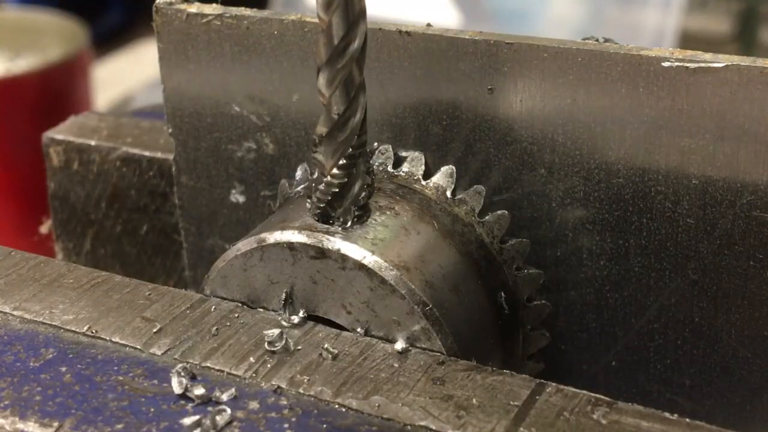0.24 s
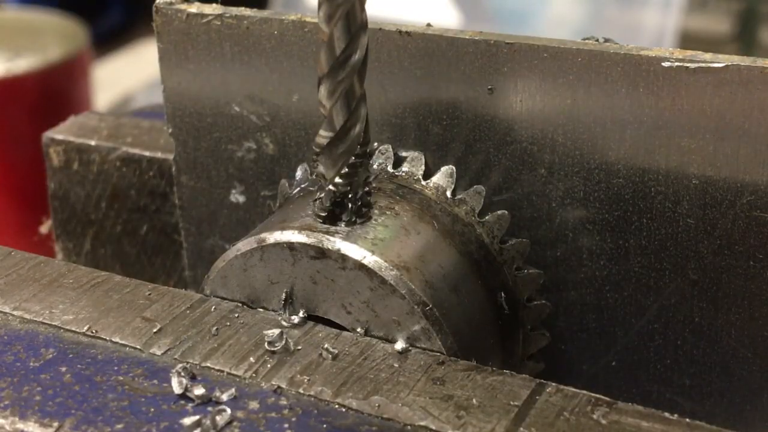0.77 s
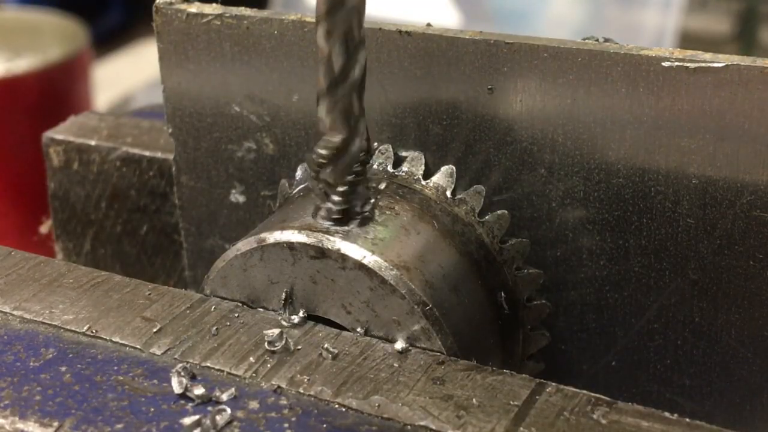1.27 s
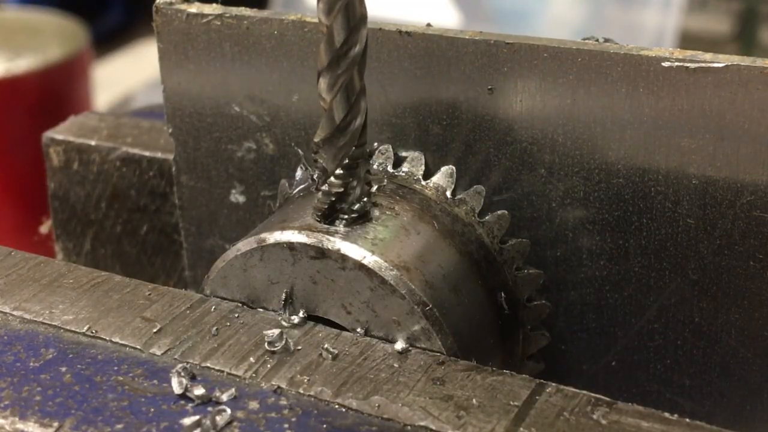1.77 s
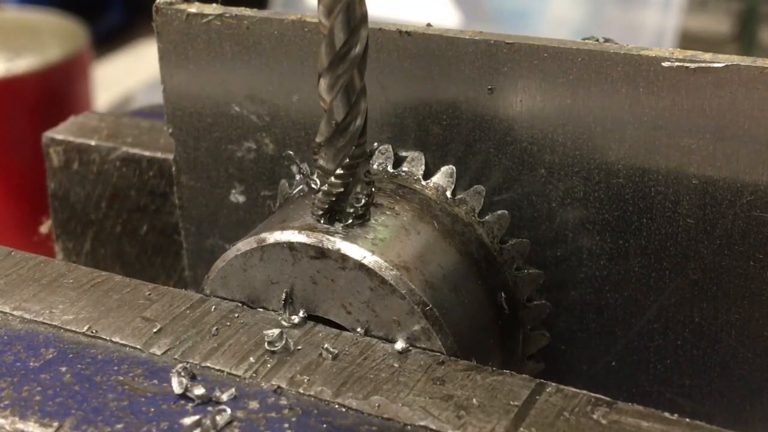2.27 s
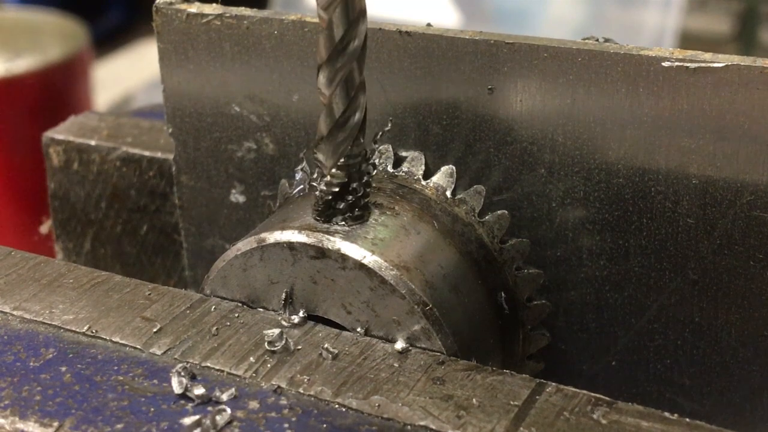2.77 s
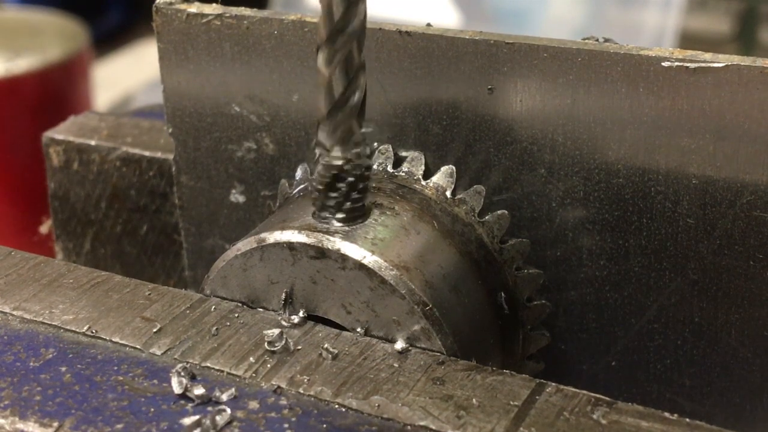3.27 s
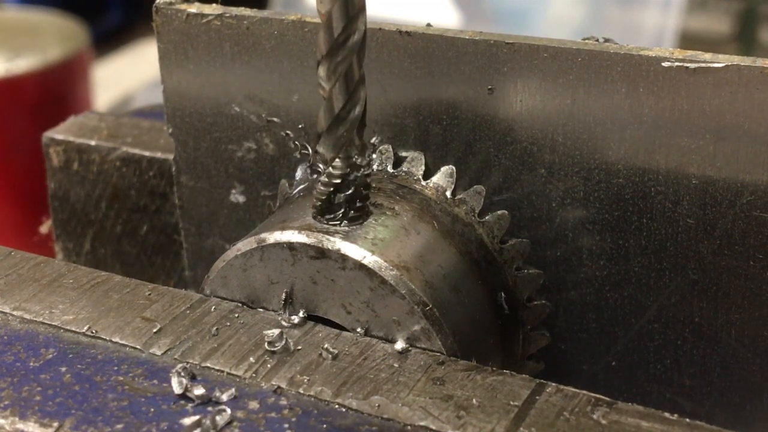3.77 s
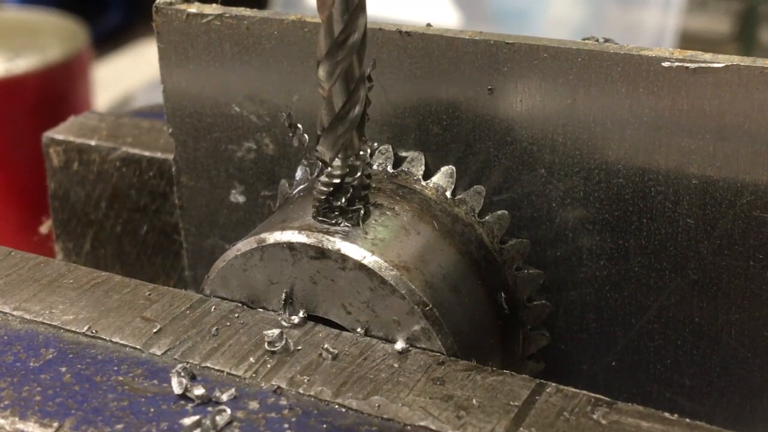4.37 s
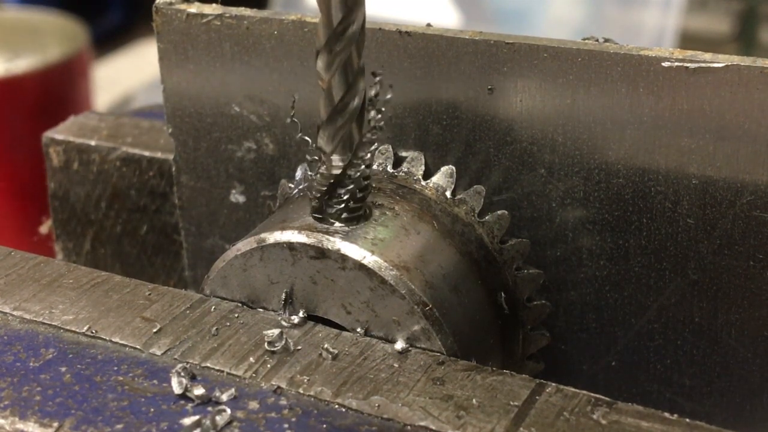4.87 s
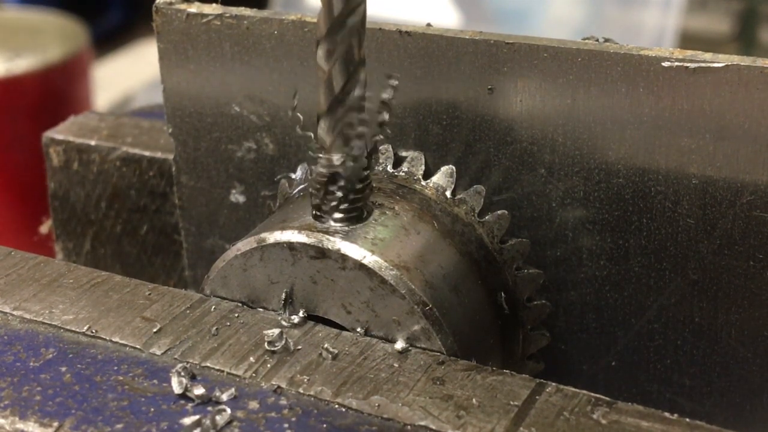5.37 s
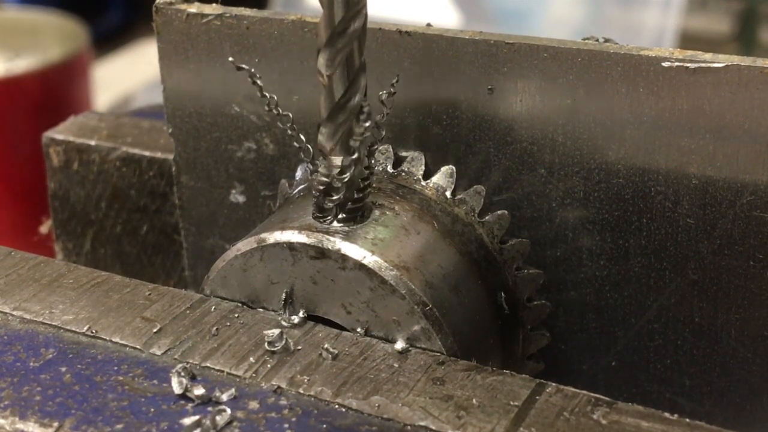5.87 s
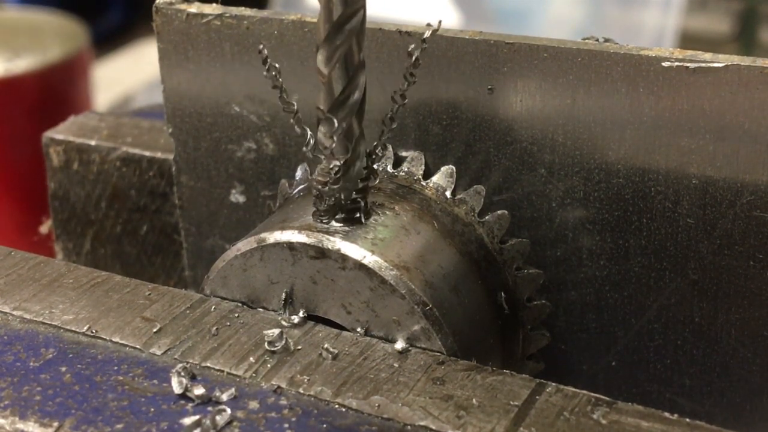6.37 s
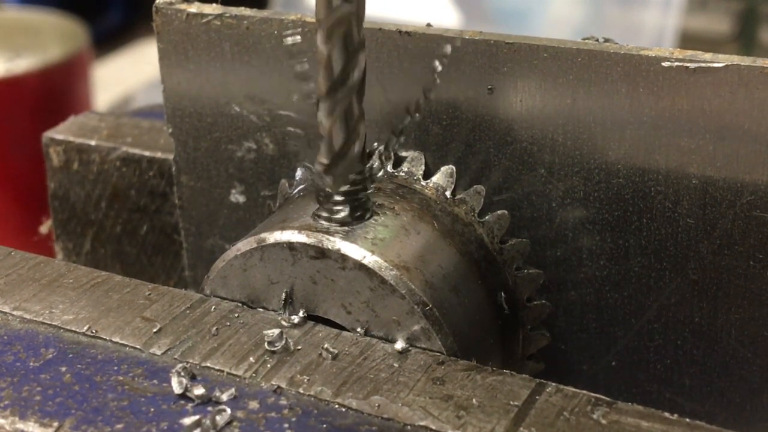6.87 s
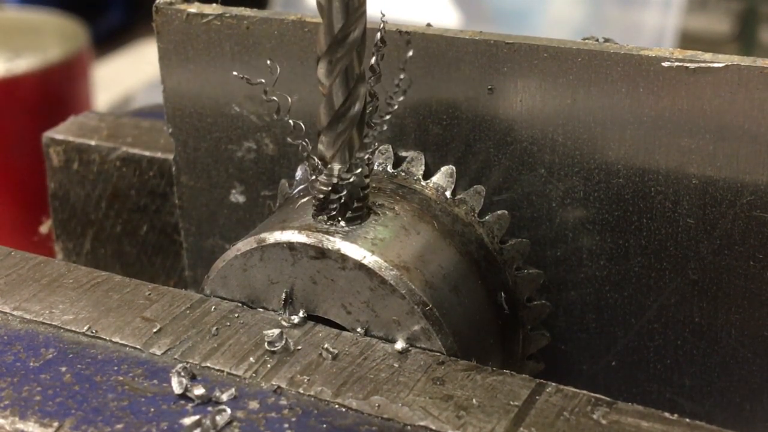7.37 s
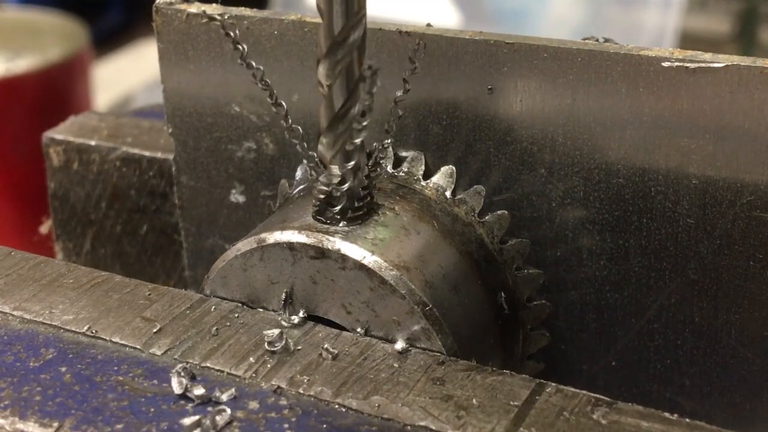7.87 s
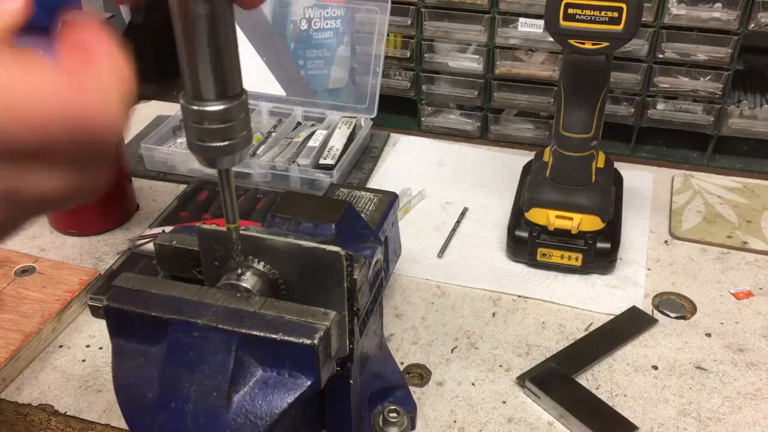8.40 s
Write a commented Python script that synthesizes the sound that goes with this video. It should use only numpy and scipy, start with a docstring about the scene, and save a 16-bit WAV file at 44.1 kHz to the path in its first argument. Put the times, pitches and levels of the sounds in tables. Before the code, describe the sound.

Close, bright metallic ratchet clicks come in regular short bursts, with soft cutting scrapes and small knocks between them, in a small, quiet room.

```python
"""Ratchet tap wrench at a vise

A ratchet tap wrench drives a tap into a steel gear held in a vise, close by in a small quiet workshop.
Each back swing takes up the slack with knocks, then the pawl rides over two or three teeth: soft ticks
and sharp clicks, made of noise bursts, decaying modes and a short ping. On each forward stroke the tap rasps
(resonant and gritty noise under a force curve) and chips crack off as bursts. The bench thuds softly as a
swelling low sine; shaped noise gives the room rumble, hiss and a faint whine."""
import sys
import numpy as np
from scipy import signal
from scipy.fft import rfft, irfft, next_fast_len
from scipy.io import wavfile
from scipy.ndimage import map_coordinates

SR = 44100
rng = np.random.default_rng(int(sys.argv[2]) if len(sys.argv) > 2 else 0)


def master_out(mix):
    """Clip the mix to full scale and print it as 16-bit PCM to the path in sys.argv[1]."""
    frames = np.transpose(np.atleast_2d(mix))
    ceiling = np.clip(frames, -1, 1)
    pcm = np.round(ceiling * 32767).astype(np.int16)
    wavfile.write(sys.argv[1], SR, pcm)


N = 381024
TIME = np.arange(N) / SR  # s
AGE = np.arange(SR // 6) / SR  # s since a contact

# All event and colour levels are relative: each source sets its own final gain.
# back swings: hand_reverses_s, play_time_s (until the slack is taken up), catch_db, load_on_tap_db
BACK_SWINGS = [(0.167, 0.021, -44, 0.5), (0.937, .016, -29.5, 3), (1.615, 0.019, -33.5, -0.5),
               (2.262, 0.024, -37.5, -1.5), (2.988, 0.012, -31.5, 0), (3.705, 0.025, -31.5, -1),
               (4.396, 0.016, -32.5, -0.5), (5.143, .019, -40, 2.5), (5.845, .023, -38.5, -3),
               (6.576, 0.022, -33, 2), (7.274, 0.018, -41.5, -0.5), (8.024, .024, -38.5, -4)]
# forward strokes: greatest_force_s, rasp_db, nominal_length_s
FORWARD_STROKES = [(0.752, -61, 0.19), (1.412, -58, 0.19), (2.069, -57, 0.17), (2.782, -58.5, 0.19),
                   (3.492, -57, 0.18), (4.19, -56.5, 0.16), (4.927, -55.5, 0.16), (5.618, -57, 0.16),
                   (6.342, -57, 0.15), (7.076, -57.5, 0.13), (7.795, -60, 0.18)]
# the hand lets the wrench settle: start_s, clack_db, knock_db
SETTLINGS = [(0.458, -36.5, -36), (1.171, -40, -45.5), (1.877, -43, -39.5), (2.522, -62, -45.5),
             (3.199, -50, -51), (3.242, -54, -45.5), (5.354, -40, -50), (6.868, -41.5, -39.5),
             (7.562, -68, -46.5), (8.284, -47, -44), (8.364, -55, -43)]
# colour of loose wrench parts in contact: frequency_hz, level_db (per Hz)
CLACK_COLOUR = [(200, -25), (800, -19.5), (2200, -0.5), (2900, -7), (4000, -1), (5800, -3), (7000, -4),
                (8400, 2), (10100, -8.5), (11400, 2), (13200, -6.5), (15500, -22.5), (16800, -26)]
# colour of breaking chips, also used for the sliding hand: frequency_hz, level_db (per Hz)
CHIP_COLOUR = [(250, -25), (1400, -9.5), (2800, -13.5), (6200, -7.5), (7200, -1.5), (8600, 2), (10400, -8),
               (11200, 0), (15000, -6), (16600, -25)]
SEAT_S = 0.014  # delay of the contact in which a settling wrench seats


def amp(db):
    """Logarithmic level: decibels to amplitude gain."""
    return 10 ** (np.asarray(db) / 20)


def unit(x):
    """Power normalisation: scale to rms 1."""
    return x / np.sqrt(np.mean(x ** 2) + 1e-20)


def blow(x):
    """Energy normalisation: scale to the energy of one millisecond at rms 1."""
    return x * np.sqrt(SR / 1000 / (np.sum(x ** 2) + 1e-20))


def fade(t60):
    """Exponential damping: a decay that loses 60 dB in t60 seconds."""
    return amp(-60 * AGE / t60)


def along(points, hz):
    """Logarithmic frequency scale: interpolate (Hz, value) points on it."""
    f, v = np.transpose(points)
    return np.interp(np.log(hz + 1), np.log(f + 1), v)


def curve(rows):
    """Level envelope: gain per sample from (s, dB) rows, silent outside them."""
    return amp(np.interp(TIME, *np.transpose(rows), left=-200, right=-200))


def wobble(rate):
    """Slow random modulation: a smooth curve with rate knots a second."""
    knots = rng.standard_normal(int(N * rate / SR) + 4)
    return map_coordinates(knots, [TIME * rate])


def filtered(x, response):
    """Linear filtering: multiply the spectrum of x by a response of frequency."""
    size = next_fast_len(N + SR // 2)
    hz = np.fft.rfftfreq(size, 1 / SR)
    return irfft(rfft(x, size) * response(hz), size)[:N]


def noise(spectrum, grain_db=0):
    """Spectral shaping: coloured noise of rms 1, made gritty by random gain of grain_db."""
    grit = rng.standard_normal(N) * amp(grain_db * wobble(900))
    return unit(filtered(grit, lambda hz: amp(along(spectrum, hz))))


def band(centre_hz, width_hz):
    """Quadrature modulation: slow noise moves up to a resonance whose centre may vary; rms 1."""
    slow = filtered(rng.standard_normal(N), lambda hz: 1 / (1 + (2 * hz / width_hz) ** 2))
    # half the signal away, the same noise serves as the second component
    quarter = np.roll(slow, N // 2)
    phase = 2 * np.pi * np.cumsum(centre_hz * np.ones(N)) / SR
    return unit(slow * np.cos(phase) + quarter * np.sin(phase))


def burst(spectrum, t60):
    """Impulsive excitation: dying noise passes through a causal, minimum-phase colour."""
    size = len(AGE)
    log_gain = np.log(amp(along(spectrum, np.fft.rfftfreq(size, 1 / SR))))
    cepstrum = irfft(log_gain, size)
    # folding the cepstrum forward in time makes the filter causal
    cepstrum[1:size // 2] *= 2
    cepstrum[size // 2 + 1:] = 0
    puff = rng.standard_normal(size) * fade(t60)
    return blow(irfft(np.exp(rfft(cepstrum)) * rfft(puff), size))


def ring(modes, attack, scatter_db, detune):
    """Modal synthesis: damped sines struck at new strengths; each strike detunes them a little at random."""
    chance = rng.standard_normal((len(modes), 3))
    tones = 0
    for (hz, db, t60), (strength, shift, sign) in zip(modes, chance):
        gain = np.sign(sign) * amp(db + scatter_db * strength)
        tones = tones + gain * fade(t60) * np.sin(2 * np.pi * hz * (1 + detune * shift) * AGE)
    return blow(tones * (1 - np.exp(-AGE / attack)))


def add(track, s, sound):
    """Superposition: mix a sound into the track at s seconds."""
    part = track[max(round(s * SR), 0):][:len(sound)]
    part += sound[:len(part)]


def ratchet():
    """Impact excitation: the pawl ticks against teeth and clicks off them on the back swing."""
    # the pawl drops off a tooth, the pawl meets a tooth: frequency_hz, level_db (per Hz)
    crack_colour = [(200, -7), (500, -18.5), (1400, -2), (2800, -3.5), (3400, -1), (4100, -5.5),
                    (5400, 2.5), (6600, -1), (8400, 6.5), (9700, -1), (13500, -1.5), (15500, -9),
                    (16800, -14)]
    tick_colour = [(300, -15), (1000, -17.5), (3000, -17), (4500, -11.5), (5400, -2.5), (6800, -13.5),
                   (8200, -7), (10300, -1.5), (11700, 2), (14000, -11), (15500, -19.5), (16800, -32)]
    # the ratchet head sings on after each click: frequency_hz, level_db (per Hz)
    head_colour = [(9500, -50), (11150, -9.5), (11750, -1), (12250, -14), (14000, -50.5)]
    # modes of the wrench body, damped by the hand: frequency_hz, level_db, t60_s
    wrench_modes = [(3414, 4.5, 0.0095), (3290, -18.5, .035), (3546, -17.5, 0.041), (8770, -7, 0.017)]
    out = np.zeros(N)
    for s, ping_db, hz, crack_db, ring_db, knock_db in drops():
        shift, strength = rng.standard_normal(2)
        # the pawl scrapes over the tip of the tooth just before it falls
        add(out, s - 0.0022, amp(crack_db - 11.5) * burst(CLACK_COLOUR, t60=0.02))
        # every tooth sets the head singing a little differently
        shifted = [(f * (1 + 0.012 * shift), db) for f, db in head_colour]
        song = amp(-22 + 2 * strength) * burst(shifted, t60=0.14)
        add(out, s, amp(ping_db + 1.0) * (ping(hz, rebound=0.00092, rebound_db=-3) + song))
        add(out, s, amp(crack_db + 2.0) * burst(crack_colour, t60=0.01))
        body = ring(wrench_modes, attack=0.00094, scatter_db=2, detune=0.028)
        add(out, s + 0.0005, amp(ring_db) * body)
        add(out, s + 0.001, amp(knock_db - 3.0) * knock())
    for s, db in ticks():
        add(out, s, amp(db - 2.0) * burst(tick_colour, t60=0.0068))
    return out


def ping(hz, rebound, rebound_db):
    """Damped resonance: the small steel pawl rings very briefly and strikes once more as it seats."""
    swell = AGE * np.exp(-AGE / 0.00026)
    late, pitch = rng.uniform(-1, 1, 2)
    out = swell * np.sin(2 * np.pi * hz * AGE)
    second = swell * np.sin(2 * np.pi * hz * (1 + 0.025 * pitch) * AGE)
    add(out, rebound * (1 + 0.27 * late), amp(rebound_db) * second)
    return blow(out)


def knock():
    """Structure-borne sound: a blow down the tap rings gear and vise, and their clamped faces clatter."""
    # tap, gear and vise ring together: frequency_hz, level_db, t60_s
    vise_modes = [(619, -18, 0.091), (741.6, -0.5, 0.1), (914, -14.5, 0.019), (977, -4.5, 0.12),
                  (1119, -12, 0.018), (1384, 2, 0.043), (1947, 6.5, 0.023), (2255, -3.5, 0.037),
                  (2395, 5, 0.017)]
    # the clamped stack clatters: frequency_hz, level_db (per Hz)
    clatter_colour = [(120, -19.5), (280, -11), (470, -12.5), (700, 1.5), (980, 7), (1200, -5), (1450, -1),
                      (2200, -4), (2900, -11), (6000, -18)]
    modes = ring(vise_modes, attack=0.0025, scatter_db=2.5, detune=0.012)
    return amp(-4) * modes + amp(-2.5) * burst(clatter_colour, t60=0.054)


def swing_clicks():
    """Event grouping: the clicks of each back swing."""
    # the pawl drops off a tooth: start_s, level_db
    click_rows = [(0.2366, -11), (0.2758, -10.5), (1.016, -6.5), (1.0497, -11), (1.0914, -8), (1.6937, -6),
                  (1.729, -11.5), (1.7626, -9.5), (2.3401, -11.5), (2.3723, -10.5), (2.4097, -5.5),
                  (3.064, -4.5), (3.101, -11.5), (3.147, -8.5), (3.777, -6), (3.8104, -13.5),
                  (3.8482, -8.5), (4.4685, -5.5), (4.508, -9.5), (4.5531, -8), (5.2228, -9.5),
                  (5.259, -11.5), (5.2965, -10), (5.9188, -11), (5.9548, -12.5), (6.001, -8),
                  (6.6525, -9.5), (6.6888, -11), (7.3572, -4.5), (7.4015, -8), (7.4761, -11.5),
                  (8.101, -11), (8.135, -12)]
    swing_s = 0.3  # a back swing is over within this time
    return [[(s, db) for s, db in click_rows if start < s < start + swing_s]
            for start, *_ in BACK_SWINGS]


def drops():
    """Load coupling: (s, ping dB, ping Hz, crack dB, ring dB, knock dB) of each click, by tooth and load."""
    # first to third tooth of a swing; the knock weakens as the load comes off:
    # ping_hz, crack_db, wrench_ring_db, knock_db
    teeth = [(11770, -21.5, -25, -24.5), (11800, -21.5, -29.5, -28), (11670, -22.5, -28.5, -32)]
    ping_scatter = 0.0055  # standard deviation, as a share of the pitch
    rows = []
    for (*_, load_db), clicks in zip(BACK_SWINGS, swing_clicks()):
        for (s, db), (hz, crack_db, ring_db, knock_db) in zip(clicks, teeth):
            ping_hz = hz * (1 + ping_scatter * rng.standard_normal())
            rows.append((s, db, ping_hz, crack_db, ring_db + load_db, knock_db + load_db))
    return rows


def ticks():
    """Ratchet kinematics: (s, dB) where the pawl meets three teeth, even if it never clears the last."""
    first_lead_s = 0.0134  # the first tooth is met this long before it drops
    later_lead = 0.345  # a later tooth is met this share of a tooth period before it drops
    tick_db, scatter_db = -29.5, 2.5
    rise_db_per_s = 0.69  # the ticks grow firmer as the work goes on
    times = []
    for (first, _), (second, _), *_ in swing_clicks():
        climb = (1 - later_lead) * (second - first)
        times += [first - first_lead_s, first + climb, second + climb]
    return [(s, tick_db + rise_db_per_s * s + scatter_db * rng.standard_normal()) for s in times]


def rattle(spread_s, below_db, knock_below_db):
    """Secondary impacts: each click shakes loose parts into weak bounces, and the tap knocks in its hole."""
    out = np.zeros(N)
    for s, _, _, crack_db, _, knock_db in drops():
        for when, size in rng.uniform(size=(3, 2)):
            bounce_db = crack_db + below_db - 23 * size - 8.4 * when
            add(out, s + 0.0046 + spread_s * when, amp(bounce_db) * burst(CLACK_COLOUR, t60=0.027))
        add(out, s + spread_s * rng.uniform(), amp(knock_db + knock_below_db) * knock())
    return out


def slack():
    """Contact stiffness: loose wrench joints clack and knock on the tap; harder contacts are brighter."""
    out = np.zeros(N)
    for s, clack_db, knock_db, bright_db in contacts():
        # brightness tilts the colour above 4500 Hz, in dB per octave
        colour = [(hz, db + bright_db * np.log2(max(hz, 4500) / 4500)) for hz, db in CLACK_COLOUR]
        clack = amp(clack_db + 0.5) * burst(colour, t60=0.011)
        add(out, s, clack + amp(knock_db + 1.5) * knock())
    return out


def contacts():
    """Backlash: (s, clack dB, knock dB, dB per octave) as play closes before a swing and chatters shut after."""
    # first contact as the hand reverses: clack_db, knock_db, brightness_db_per_octave
    reversal = (-39.5, -41.5, -11)
    catch_knock_db, catch_bright_db = -3, -1  # knock against its clack; brightness per octave
    seat_clack_db, seat_bright_db = -9.5, -6  # clack against the first; brightness per octave
    chatter_db = -5.5  # against the clack and knock of the settling
    rows = []
    for s, play_s, db, _ in BACK_SWINGS:
        rows.append((s, *reversal))
        rows.append((s + play_s, db, db + catch_knock_db, catch_bright_db))
    for s, clack_db, knock_db in SETTLINGS:
        rows.append((s, clack_db, knock_db, 0))
        # a duller contact follows as the wrench seats
        rows.append((s + SEAT_S, clack_db + seat_clack_db, knock_db, seat_bright_db))
        # the joint chatters while it seats
        for when in rng.uniform(size=2):
            rows.append((s + SEAT_S * when, clack_db + chatter_db, knock_db + chatter_db, seat_bright_db))
    return rows


def cutting():
    """Friction excitation: the edges rasp through steel; the tap's resonance rises slightly under load."""
    # colour of the rasp: frequency_hz, level_db (per Hz)
    rasp_colour = [(200, -20.5), (500, -7.5), (740, 3), (1150, -0.5), (1650, -6), (1900, 3.5), (2300, -7),
                   (2800, -17.5), (3900, -4.5), (5800, -19.5), (8300, -12.5), (10200, -26), (11500, -18.5),
                   (15500, -21.5)]
    force = stroke_force(stretch=0.94)
    load = force / force.max()
    resonance = band(1395 + 25 * load + 12 * wobble(14), width_hz=112)
    out = amp(1.3) * force * resonance
    out += amp(-0.5) * force * amp(1.2 * wobble(31)) * noise(rasp_colour, grain_db=3.5)
    # crumbs crackle for as long as the tap turns
    out += amp(-10) * stroke_force(stretch=1.2) * crumbs(rate=460)
    for s, db in chips():
        add(out, s, amp(db - 2.3) * burst(CHIP_COLOUR, t60=0.011))
    return out


def stroke_force(stretch):
    """Force envelope: it swells and eases on each stroke, 10 dB down at the ends of the stretched length."""
    return sum(amp(db - 10 * (2 * (TIME - s) / (length * stretch)) ** 2)
               for s, db, length in FORWARD_STROKES)


def crumbs(rate):
    """Brittle fracture: rate tiny breaks a second, of unequal size and pitch; rms 1."""
    out, age = np.zeros(N), AGE[:SR // 500]
    for when, size, pitch in rng.uniform(size=(int(rate * N / SR), 3)):
        hz = 6500 + 8500 * pitch
        grain = np.exp(-age / 0.00016) * np.sin(2 * np.pi * hz * age)
        add(out, when * N / SR, amp(22 * size ** 2) * grain)
    return unit(filtered(out, lambda hz: amp(along(CHIP_COLOUR, hz))))


def chips():
    """Chip fracture: (s, dB) of the large chips, and of a small one near the height of each stroke."""
    # the largest chips break at the cutting edge: start_s, level_db
    large_chips = [(0.7434, -38), (1.384, -35.5), (1.4412, -40.5), (1.9994, -37), (2.1104, -29),
                   (2.8131, -41), (3.4983, -41.5), (5.7191, -41), (6.2813, -37.5)]
    small_db, scatter_db = -48.5, 3.5
    spread = 0.23  # standard deviation in time, as a share of the nominal stroke length
    rows = list(large_chips)
    for s, _, length in FORWARD_STROKES:
        when = s + spread * length * rng.standard_normal()
        rows.append((when, small_db + scatter_db * rng.standard_normal()))
    return rows


def handling():
    """Lowest-mode resonance and friction: the bench booms briefly; the hand slides on the handle."""
    # the hand slides on the handle: time_s, level_db
    slide_level = [(8.27, -89.5), (8.33, -63.5), (8.4, -56), (8.45, -82)]
    out = curve(slide_level) * noise(CHIP_COLOUR, grain_db=1)
    for s, db in jolts():
        swell = np.sin(np.pi * np.minimum(AGE / 0.11, 1)) * fade(0.2)
        thud_hz = 114 + 6 * rng.standard_normal()
        add(out, s, amp(db + 14.0) * swell * np.sin(2 * np.pi * thud_hz * AGE))
    return out


def jolts():
    """Momentum transfer: (s, dB) as the hand jolts the bench at swing start, swing stop and seating."""
    first_db, last_db = -52, -54  # at the first and last click of a swing
    seat_db = -9  # against a settling knock
    rows = [(s + SEAT_S, knock_db + seat_db) for s, _, knock_db in SETTLINGS]
    for clicks in swing_clicks():
        rows += [(clicks[0][0], first_db), (clicks[-1][0], last_db)]
    return rows


def workshop(x, echo_s, echo_db, wet_db):
    """Reverberation: an echo off the bench, then a short, duller noise tail, renewed every quarter second."""
    # reverberation of the workshop: frequency_hz, t60_s
    room_decay = [(150, 0.64), (1000, 0.39), (3400, 0.27), (7000, 0.2), (11700, 0.19), (16000, 0.34)]
    out = x + amp(echo_db) * filtered(x, lambda hz: np.exp(-2j * np.pi * hz * echo_s))
    spill = amp(wet_db) * filtered(x, lambda hz: 1 / np.hypot(1, hz / 6000))
    # each tail is fresh random noise that decays at its own rate in each frequency
    for start in range(0, N, SR // 4):
        hz, t, z = signal.stft(rng.standard_normal(SR // 2), SR, nperseg=256)
        decay = amp(-60 * t / along(room_decay, hz)[:, None])
        tail = signal.istft(z * decay, SR, nperseg=256)[1]
        wet = signal.fftconvolve(spill[start:start + SR // 4], tail / np.linalg.norm(tail))
        add(out, start / SR + 0.0025, wet)
    return out


def background():
    """Ambient noise: shaped random noise gives room rumble and hiss, and a narrow band a faint whine."""
    # colours of the room's rumble and hiss: frequency_hz, level_db (per Hz)
    rumble_colour = [(22, -36.5), (38, -9), (60, 7.5), (80, -5.5), (125, -7), (165, -15.5), (200, -9),
                     (250, -15), (330, -15), (450, -27), (900, -60.5)]
    air_colour = [(100, 0), (450, -3.5), (650, 1.5), (780, -5.5), (950, 3.5), (1300, -9), (2000, -7),
                  (3000, -13.5), (6000, -14), (9000, -14), (12000, -16.5), (15500, -19.5), (16200, -47)]
    # level of the hiss: time_s, level_db
    hiss_level = [(0, -67.5), (8.15, -68), (8.25, -64.5), (8.64, -65)]
    rumble = amp(-58.0) * noise(rumble_colour)
    hiss = curve(hiss_level) * noise(air_colour)
    whine = amp(-79.5) * band(1720, width_hz=14)
    return rumble + hiss + whine


def scene():
    """Superposition: all the work at the vise in the room, with handling and background."""
    work = ratchet() + rattle(spread_s=0.07, below_db=-14, knock_below_db=-14) + slack() + cutting()
    return (workshop(work, echo_s=0.0049, echo_db=-16.5, wet_db=-11.5) + handling() + background())[None]


def record(dry):
    """Saturation and band limiting: the highest peaks are rounded off, and nothing passes above top_hz."""
    top_hz = 16900
    held = dry[0] / (1 + np.abs(dry[0]) ** 8) ** (1 / 8)
    return filtered(held, lambda hz: np.clip((top_hz - hz) / 1300, 0, 1) ** 2)[None]


dry = scene()
out = record(dry)
master_out(out)
```